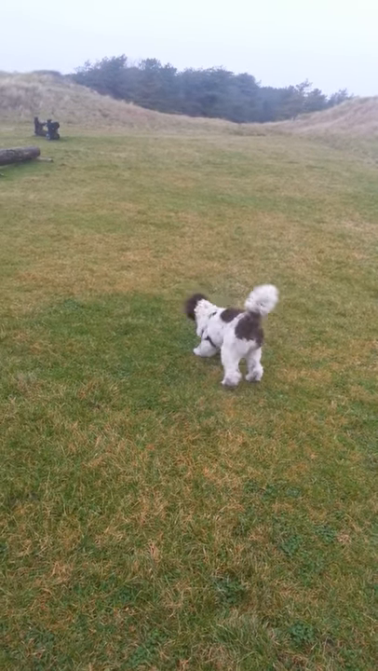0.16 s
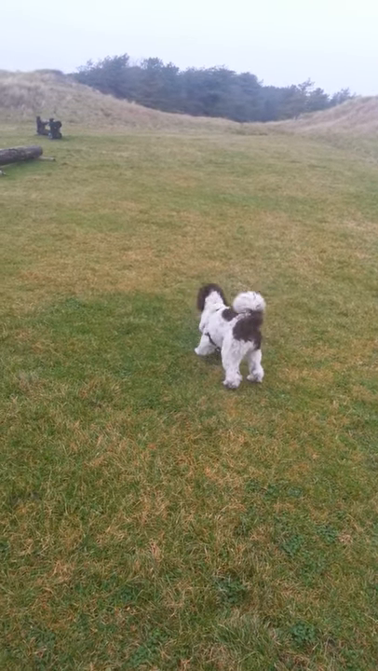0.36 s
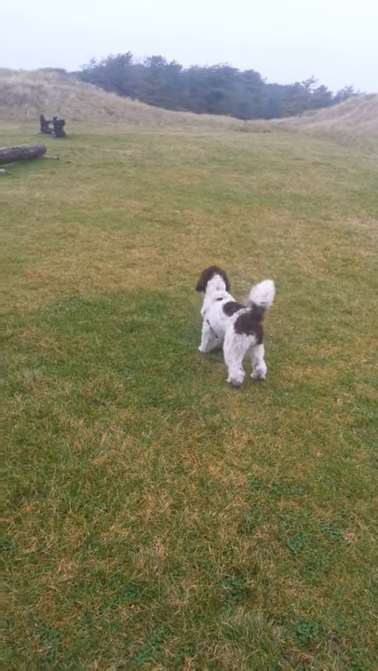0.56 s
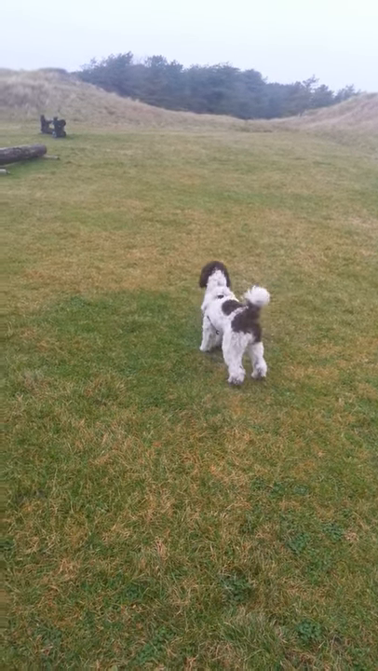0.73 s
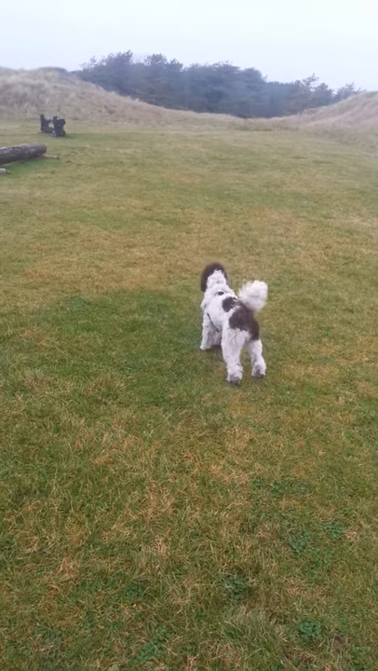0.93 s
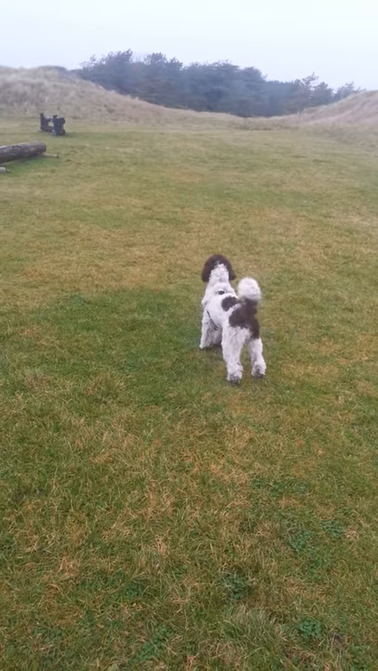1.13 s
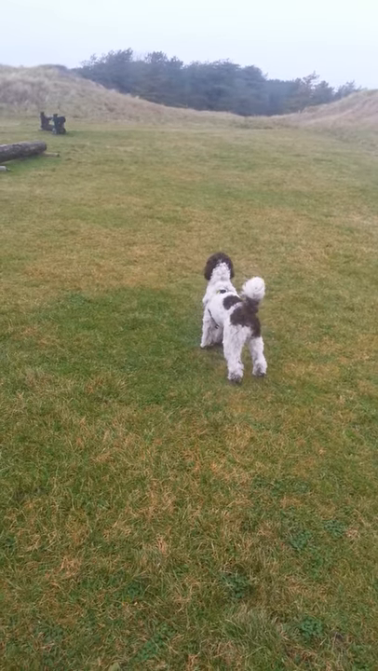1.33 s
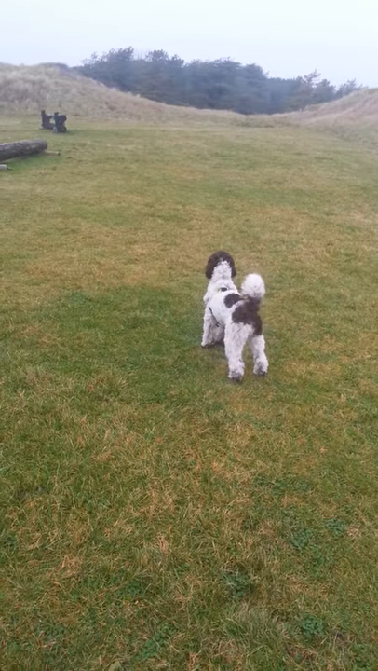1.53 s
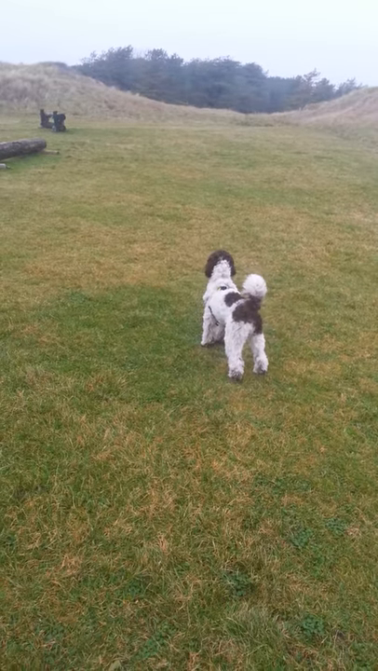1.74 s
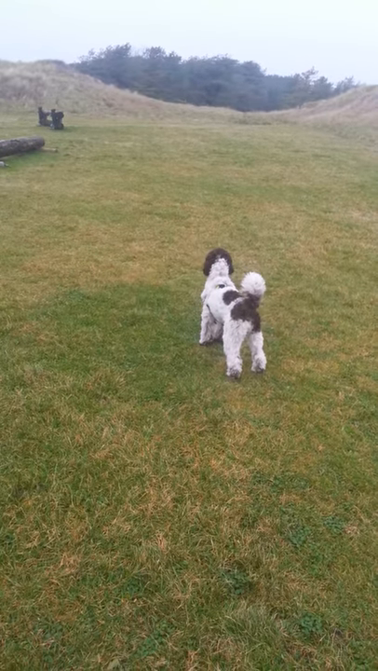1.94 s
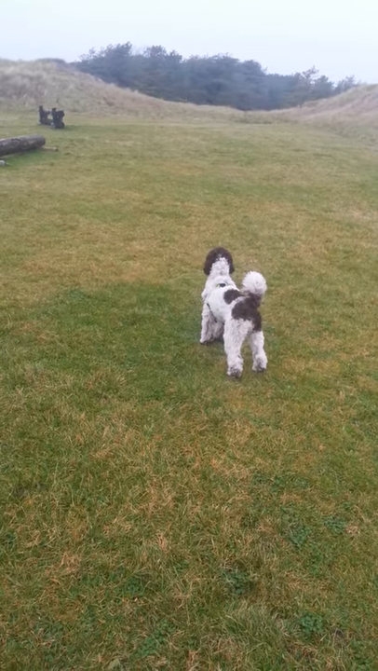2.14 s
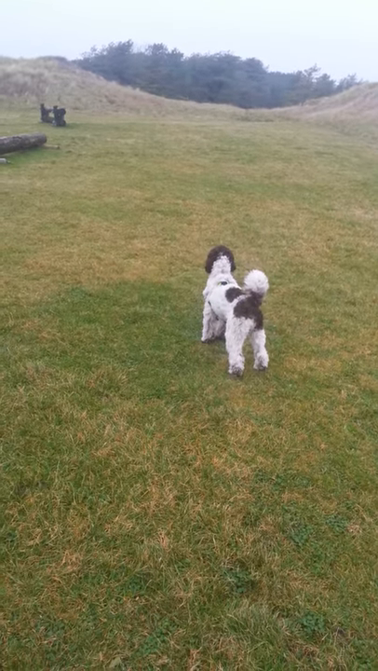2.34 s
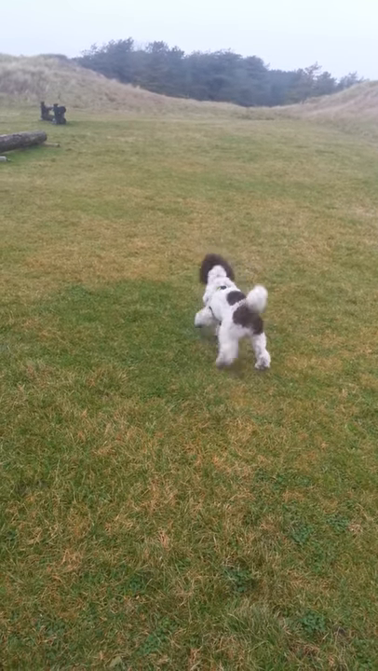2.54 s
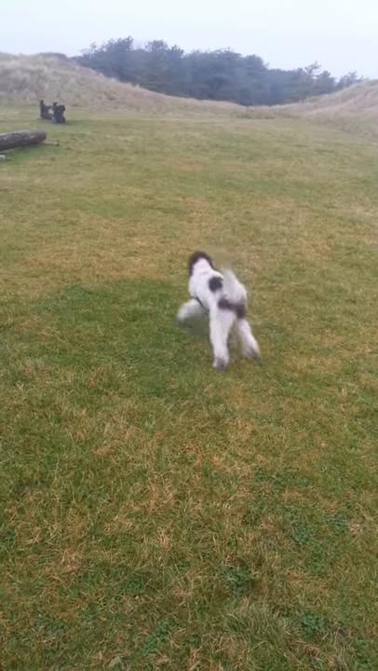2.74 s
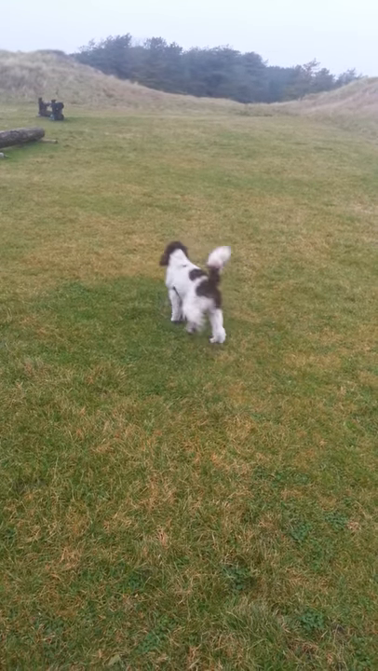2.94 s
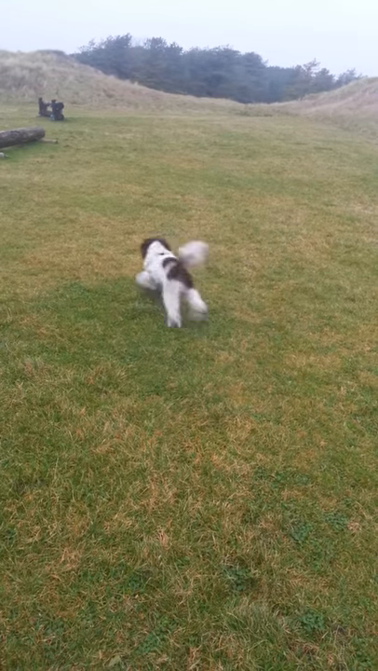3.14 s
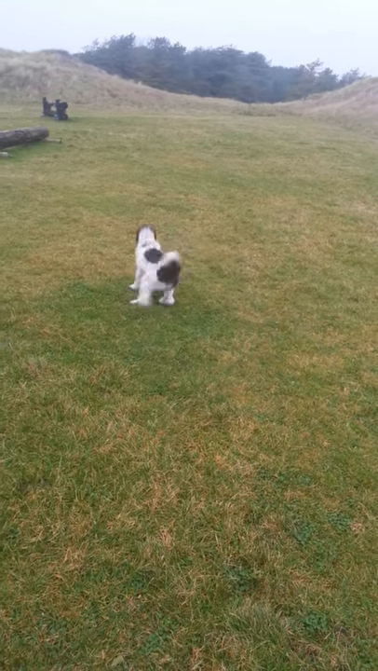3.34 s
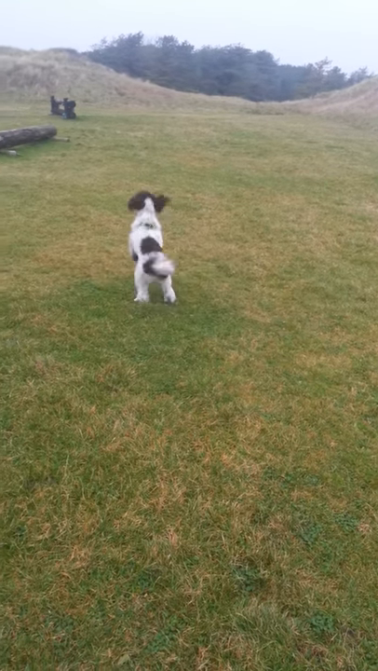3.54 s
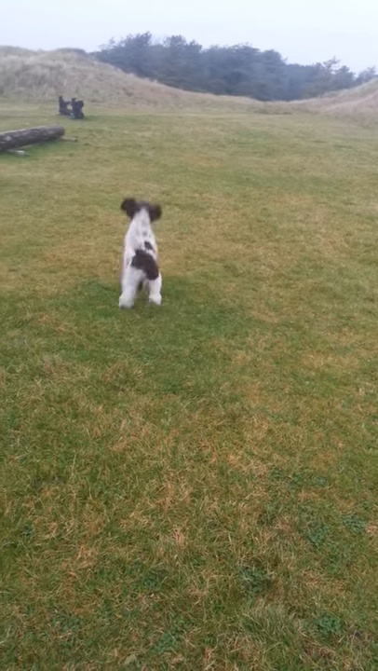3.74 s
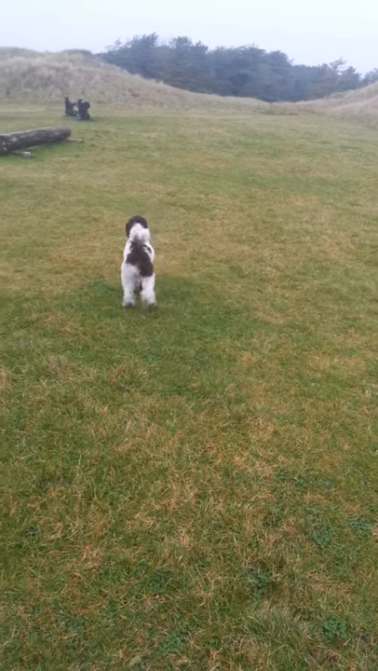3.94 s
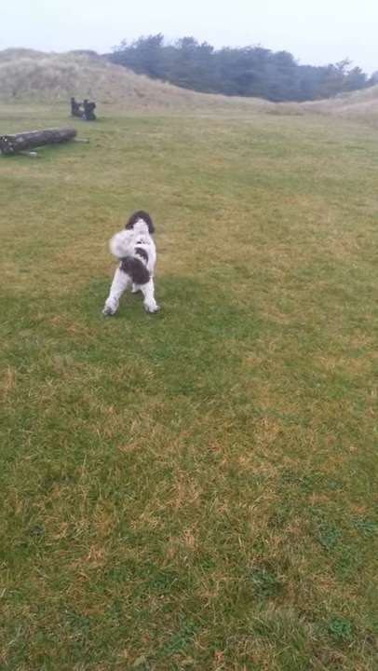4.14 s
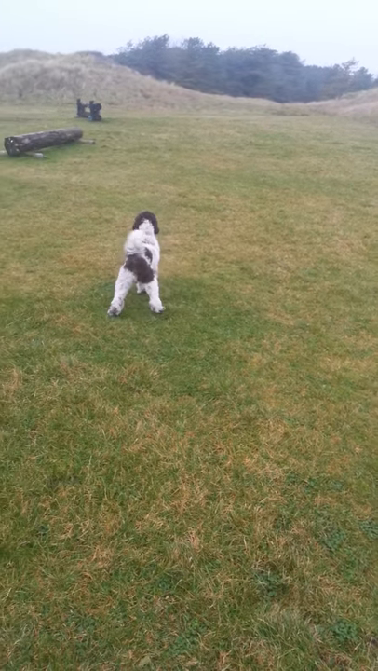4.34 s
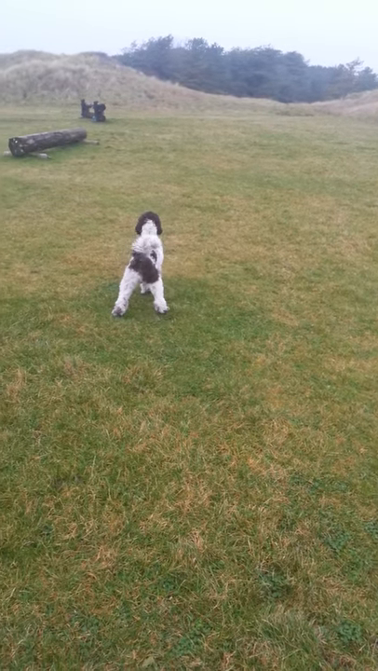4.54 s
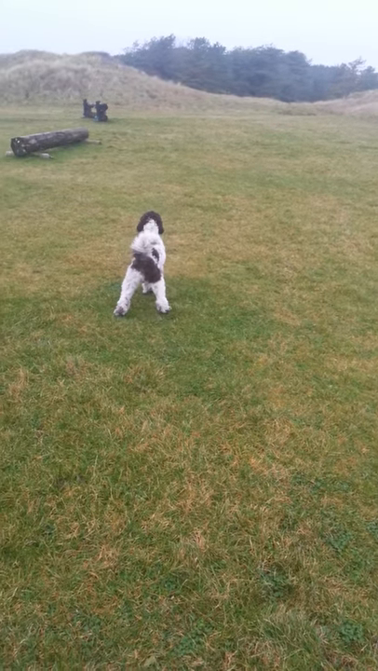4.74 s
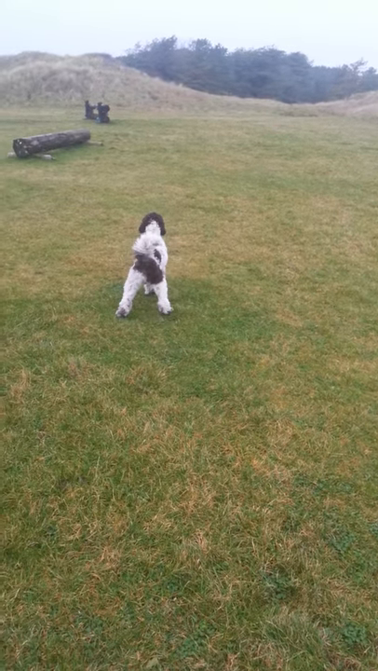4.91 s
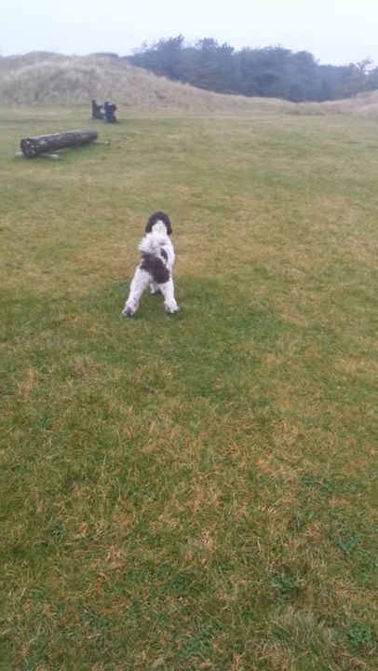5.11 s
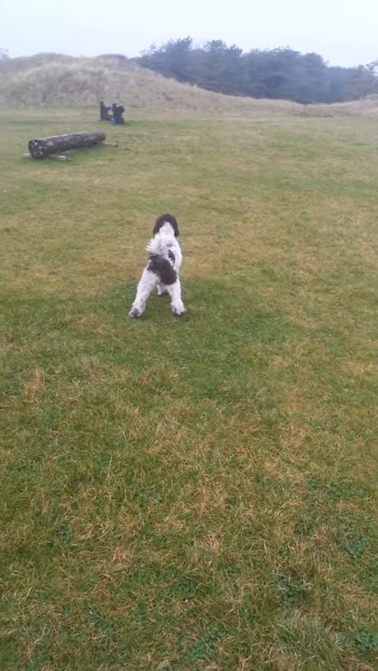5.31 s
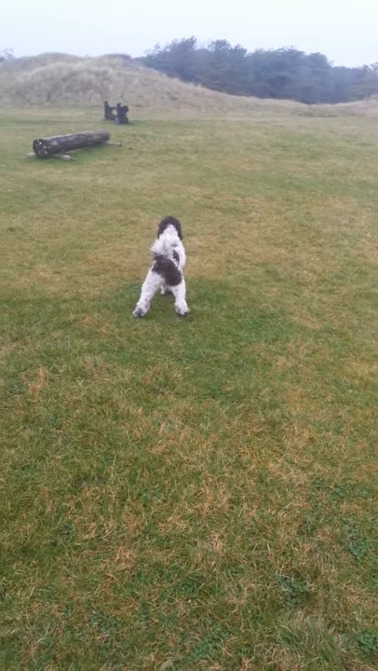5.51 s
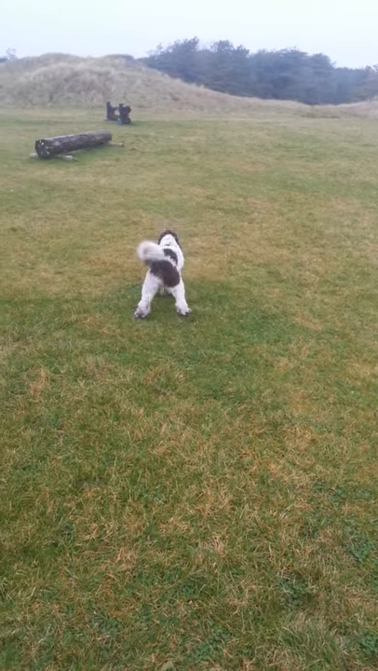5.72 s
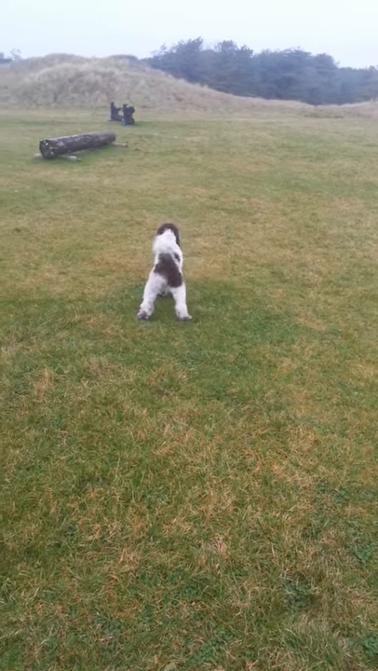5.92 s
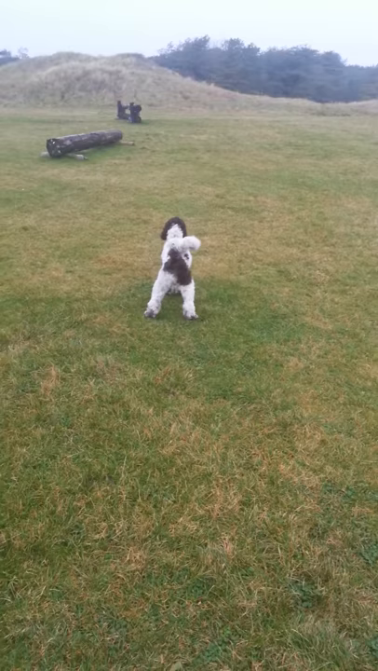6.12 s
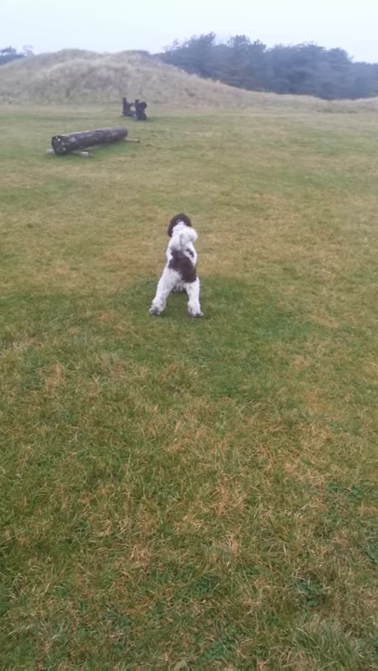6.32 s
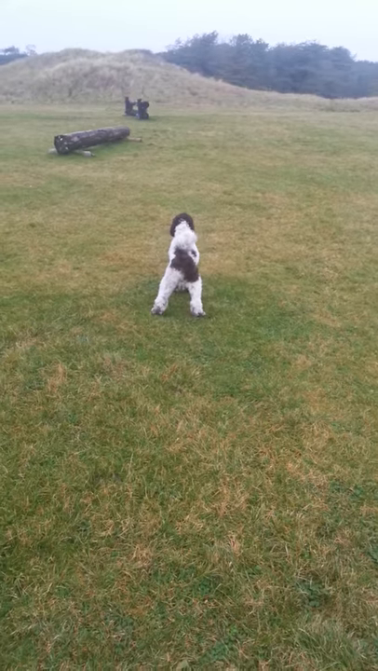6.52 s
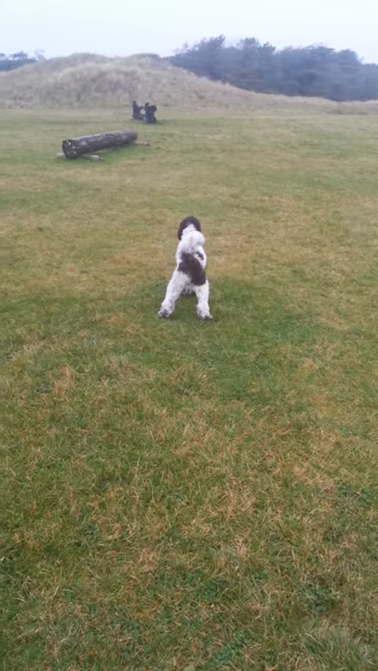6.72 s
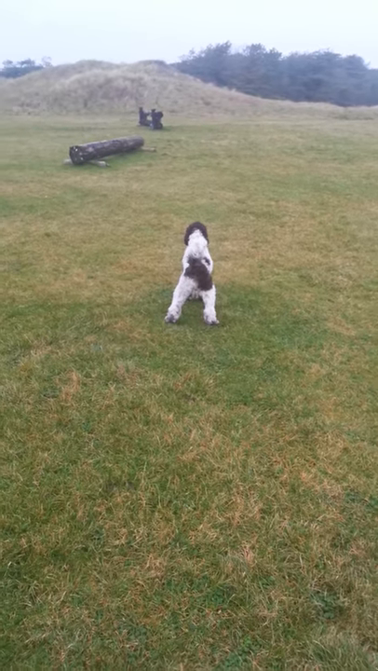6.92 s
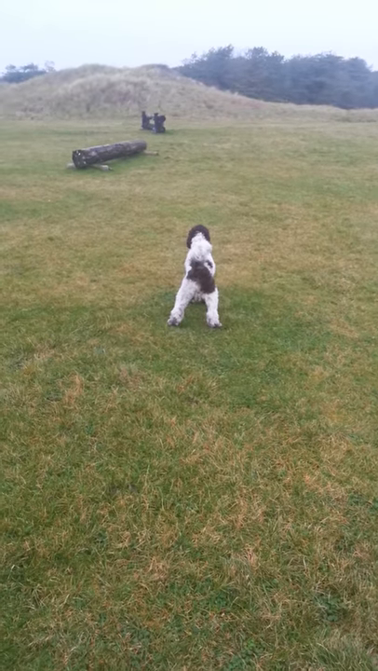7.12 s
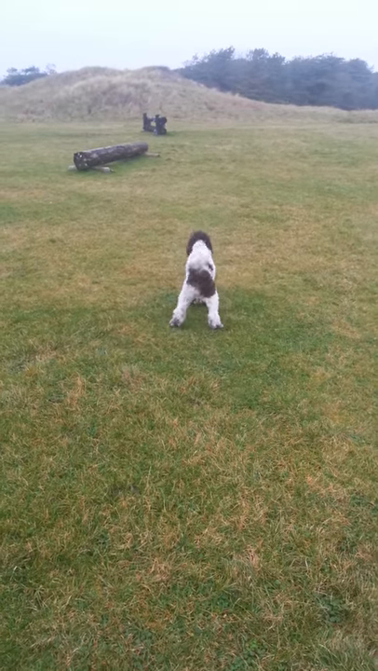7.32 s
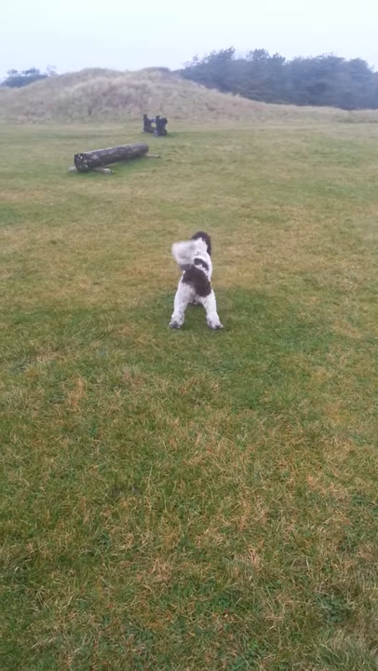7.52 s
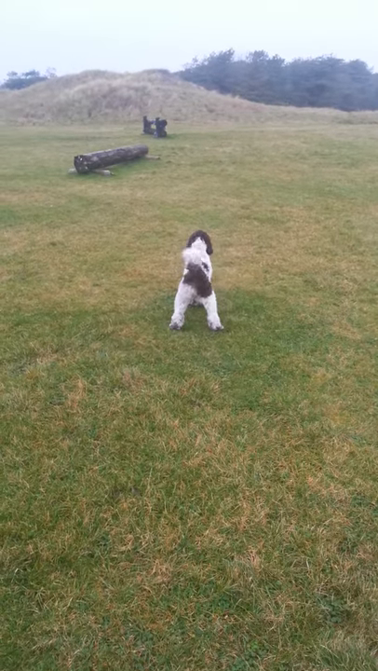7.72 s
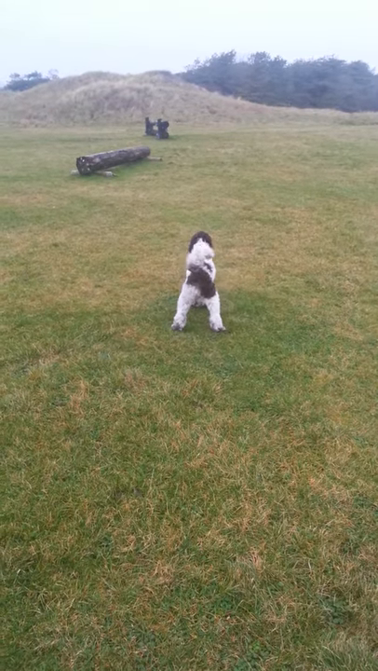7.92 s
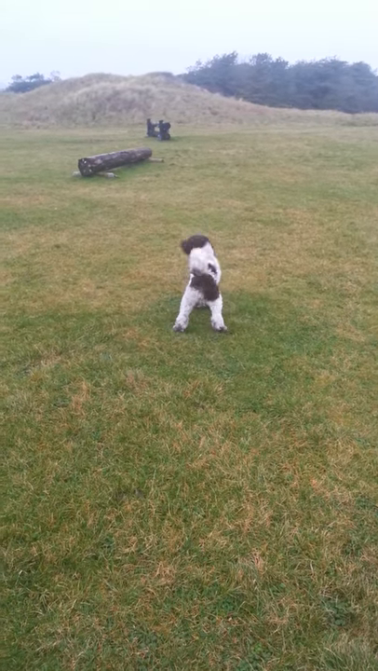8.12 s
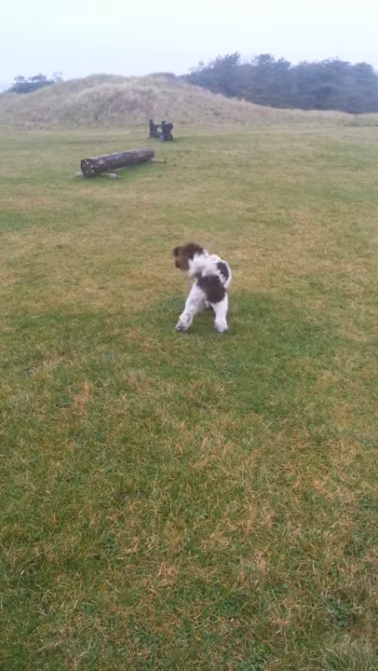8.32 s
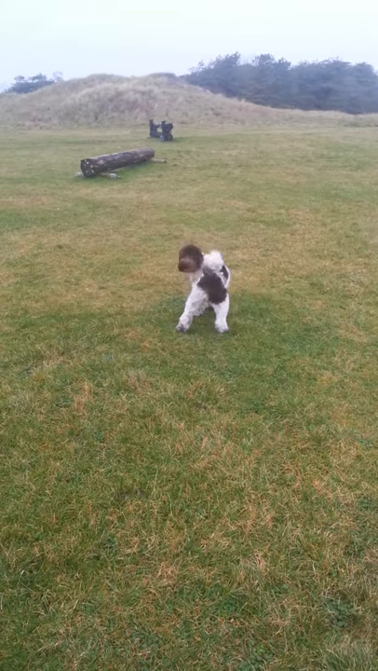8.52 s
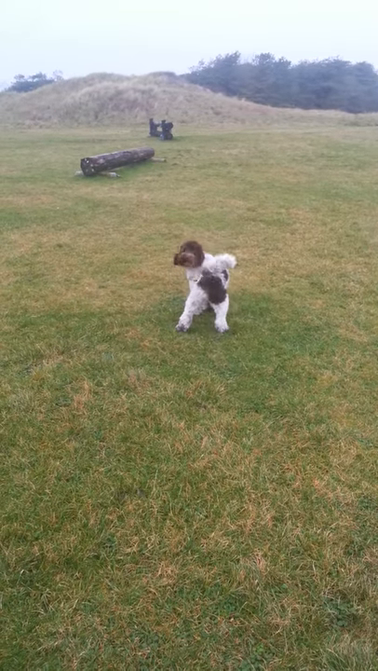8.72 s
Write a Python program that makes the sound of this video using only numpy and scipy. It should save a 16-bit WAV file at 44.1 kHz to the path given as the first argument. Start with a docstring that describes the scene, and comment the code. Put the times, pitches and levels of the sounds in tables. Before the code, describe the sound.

A young dog barks outdoors a few metres from a handheld camera: a bark already under way at the start, then short, hoarse yaps with long gaps, two coming close together. Soft growls and breaths surround some. A faint scattered echo follows. Wind thumps the microphone increasingly, over a far dull roar, light hiss, a thin whine and small focus clicks.

```python
"""A young dog barks on a grassy field between dunes, a few metres from a hand-held camera, with low growls
around some barks: vocal-fold harmonics and air noise through a tract, a faint echo from the dunes after them.
Gusts buffet the two microphone ports as lumpy low noise; under all lies a far roar (surf or traffic).
Gliding tones chirp far off. Inside the camera the focus drive ticks as ringing clicks with a short whirr,
noise hisses, and a thin sine whines near the left port."""
import sys
import numpy as np
from scipy import signal
from scipy.fft import rfft, irfft, next_fast_len
from scipy.io import wavfile
from scipy.ndimage import uniform_filter1d, minimum_filter1d, map_coordinates

SR = 44100
rng = np.random.default_rng(int(sys.argv[2]) if len(sys.argv) > 2 else 0)


def output_pcm(signal):
    """Save a mono or channel-first signal as 16-bit PCM at the path in sys.argv[1].

    Samples are clipped to [-1, 1] before scaling.
    """
    pcm = np.clip(np.atleast_2d(signal).T, -1, 1) * 32767
    wavfile.write(sys.argv[1], SR, np.round(pcm).astype(np.int16))


N = 390726
PADDED = next_fast_len(N + SR // 10)   # room for filter tails
BINS_HZ = np.fft.rfftfreq(PADDED, 1 / SR)

# where turbulent air rings in throat and mouth: centre_hz, width_hz, level_db
THROAT = [(599, 180, -0.5), (926, 150, 1), (1574, 140, -5.5), (2146, 250.7, -26)]
# moments when the folds skip a beat and the throat rings freely: time_s, peak_db (before the ports colour it)
BREAKS = [(0.832, -6), (0.899, -25), (0.939, -29.5), (2.544, 6), (2.578, 2.5), (3.224, -26), (3.515, -9),
          (3.544, 3.5), (3.623, -20), (5.635, -12.5), (5.68, -15), (7.364, -14), (7.394, -14.5),
          (8.212, -7.5)]


def amp(db):
    """Decibels to gain."""
    return 10 ** (np.asarray(db) / 20)


def rms_one(x):
    """Scales to unit power."""
    return x / np.sqrt(np.mean(np.abs(x) ** 2, axis=-1, keepdims=True) + 1e-20)


def in_time(rows, t):
    """Table columns read at times t."""
    s, *columns = np.transpose(rows)
    return [np.interp(t, s, c) for c in columns]


def at_hz(points, hz):
    """Straight lines between table points on a log-frequency axis."""
    points_hz, values = np.transpose(points)
    return np.interp(np.log(hz + 1), np.log(points_hz + 1), values)


def drift(rate_hz, size=N):
    """Slow chance with spread 1: white noise through two equal poles."""
    r = np.exp(-2 * np.pi * rate_hz / SR)
    slow = signal.lfilter([1], [1, -2 * r, r * r], rng.standard_normal(size + 8000))
    return rms_one(slow[-size:])   # the settling start is dropped


def coloured(x, spectrum):
    """Shapes a sound by a table of frequency and dB."""
    return irfft(rfft(x, PADDED) * amp(at_hz(spectrum, BINS_HZ)), PADDED)[..., :N]


def resonance(x, hz, width_hz):
    """Two-pole resonance, gain 1 on top."""
    r = np.exp(-np.pi * width_hz / SR)
    zeros = np.array([1, 0, -1]) * (1 - r * r) / 2
    poles = [1, -2 * r * np.cos(2 * np.pi * hz / SR), r * r]
    return signal.lfilter(zeros, poles, x)


def cavities(x, table):
    """Parallel resonances, each applied twice for dark valleys."""
    out = 0
    for hz, width_hz, db in table:
        once = resonance(x, hz, width_hz)
        out = out + amp(db) * resonance(once, hz, width_hz)
    return out


def pan(left_minus_right_db):
    """Left and right gain for a level difference, total power kept."""
    left = amp(left_minus_right_db)
    return np.array([left, 1 + 0 * left]) * np.sqrt(2 / (1 + left ** 2))


def dog():
    """Barks and growls: calls that follow without a pause form one phrase, faded in and out."""
    # calls: colour at full effort (chest_db, palate_db, rasp_db, air_db, all re throat),
    # then the gesture rows (start_s, pitch_hz, throat_db, mouth_db re throat)
    voice = [ ((-6.5, -14, -21.5, -11), [(0.0, 412, -12, 6.5), (0.052, 466.6, -12, -6.5),
             (0.086, 432, -18.5, -8), (0.102, 375.3, -27, -16.5), (0.135, 269, -37, -18)]),
             ((-4.5, -33.5, -34, -19), [(0.61, 126.9, -56.5, -3.5), (0.64, 123.6, -42.5, -30),
             (0.696, 124.4, -48, -16), (0.758, 170.5, -44, -24.5), (0.775, 234.7, -39.5, -29)]),
             ((-7.5, -38.5, -33.5, -12), [(0.78, 283.4, -37.5, -28.5), (0.794, 337.9, -20, -20),
             (0.81, 409.6, -14, -0.5), (0.846, 467.1, -9, -14.5), (0.862, 492, -12.5, 1.5),
             (0.901, 442.8, -15.5, -11), (0.913, 396.3, -24, -9.5), (0.941, 292.6, -26, -25),
             (0.97, 214.7, -39, -7)]), ((-5.5, -27, -24, -15), [(0.975, 198.4, -48, -15.5),
             (0.991, 154, -43, -15), (1.029, 132.8, -44, -22), (1.209, 110, -62, -22),
             (1.26, 102, -52, -17)]), ((-6, -35.5, -34.5, -8.5), [(2.44, 153.4, -54.5, -23.5),
             (2.478, 252.3, -35, -39), (2.496, 382.8, -18, -3.5), (2.51, 437.2, -14, 1),
             (2.533, 458.6, -9, -3.5), (2.561, 529.8, -13, -7.5), (2.587, 506, -16, -9.5),
             (2.6, 446, -19.5, -10.5), (2.66, 196, -39.5, -24)]), ((0, -30, -36, -10.5),
             [(3.105, 186.5, -53, -12), (3.121, 281.3, -44.5, -19.5), (3.135, 361.8, -25, -1.5),
             (3.151, 456, -22, 0), (3.19, 496.5, -17, -1.5), (3.211, 514, -18, 2.5),
             (3.229, 494.4, -16.5, -10), (3.251, 477, -26.5, -4.5), (3.3, 320.9, -49, -30)]),
             ((-3.5, -31, -26, -18.5), [(3.305, 291.5, -66, -14), (3.329, 233.2, -49.5, -10),
             (3.361, 198, -47.5, 1), (3.419, 147.8, -44, -24), (3.437, 172.8, -45, -22),
             (3.455, 199, -44, -39)]), ((-8.5, -40, -35.5, -9.5), [(3.46, 230.4, -29.5, -34),
             (3.474, 326, -28, -27), (3.482, 360.6, -17.5, -13), (3.51, 421, -15, -14),
             (3.543, 450, -20.5, 4), (3.573, 416.4, -14, -7), (3.603, 378, -35, -24),
             (3.627, 298.5, -35.5, -33), (3.66, 224, -22.5, -2)]), ((-11.5, -27.5, -36, -12),
             [(5.555, 156.2, -54, -24), (5.589, 319, -20.5, -35), (5.601, 393.2, -21, -13),
             (5.627, 455, -11.5, -7), (5.652, 486.7, -9.5, -16.5), (5.667, 519, -14.5, -13),
             (5.683, 535, -6, -21.5), (5.712, 475, -20, -24), (5.733, 330, -19.5, -21),
             (5.755, 280, -48, -5)]), ((-10.5, -27, -35, -12.5), [(7.275, 152.2, -33, -20.5),
             (7.295, 263.4, -27.5, -26), (7.321, 431, -16.5, 0.5), (7.359, 461.9, -9.5, -3.5),
             (7.385, 449.7, -17, 1.5), (7.411, 424.4, -16.5, -12), (7.448, 332, -31, -20),
             (7.489, 240, -59, 1), (7.53, 173, -49, -10)]), ((-14, -20, -23, -14),
             [(8.14, 213.8, -40.5, -19), (8.156, 287.5, -30, -33.5), (8.172, 381.4, -21.5, -12),
             (8.2, 469.1, -14.5, -2.5), (8.237, 498.4, -5.5, -9.5), (8.263, 490, -15, 0),
             (8.286, 425, -12.5, -12.5), (8.307, 305, -17, -32), (8.335, 250, -50, -15)]), ]
    phrases = []
    for colour_db, rows in voice:
        if not phrases or rows[0][0] - phrases[-1][-1][0] > .05:
            phrases.append([])
        phrases[-1] += gesture(colour_db, rows)
    out = np.zeros(N)
    for rows in phrases:
        sound, start = utterance(rows), round(rows[0][0] * SR)
        ramp = np.arange(len(sound)) / (0.024 * SR)
        fade_in = np.minimum(ramp, 1) if start else 1   # a call under way at 0 s starts at full level
        fade_out = np.minimum(ramp[::-1] / 2, 1)
        out[start:start + len(sound)] = sound * fade_out * fade_in
    # the voice keeps nothing below about 80 Hz
    return signal.sosfilt(signal.butter(4, 80, "high", fs=SR, output="sos"), out)


def gesture(colour_db, rows):
    """Adds the colour that effort gives; throat and mouth swing fully, the other parts follow in part."""
    # throat level that a pitch usually brings: pitch_hz, level_db
    usual_throat = [(120, -49.5), (250, -35.5), (400, -16.5), (520, -13)]
    # what slack folds add: chest_db, palate_db, rasp_db, air_db
    slack_colour_db = np.array((11.5, 5.5, 7.5, -8.5))
    # share of the throat's own swings not followed (0-1): chest, palate, rasp, air
    steadiness = np.array((0.8, 0.49, 0.584, .4))
    open_share, usual_mouth_db = 0.31, -8   # palate and rasp follow this share of a wider or narrower mouth
    out = []
    for s, pitch, throat, mouth in rows:
        swing_db = throat - at_hz(usual_throat, pitch)
        slack = 1 - effort(pitch)
        chest, palate, rasp, air = colour_db + slack * slack_colour_db - swing_db * steadiness
        open_db = open_share * effort(pitch) * (mouth - usual_mouth_db)
        out.append((s, pitch, throat, chest, mouth, palate + open_db, rasp + open_db, air))
    return out


def utterance(rows):
    """Harmonics of the vocal folds through the tract; rough folds trade the clean line for sidebands."""
    # where chest, throat, mouth, palate and rasp act: centre_hz
    regions_hz = [400, 900, 1600, 2500, 6500]
    # fine colour of the voice as heard, with a gap near 4.5 kHz: frequency_hz, gain_db
    fine_colour = [(115, 5.5), (240, 10), (300, 5.5), (355, -9.5), (430, 0), (600, 2), (950, 4), (1250, -9),
                   (1600, 1), (2000, -2.5), (2300, -3.5), (2800, -9.5), (3300, -16), (3900, -4.5),
                   (4350, -20), (4800, -21.5), (5400, -2), (6400, -5), (7400, -2), (8400, -10), (9300, -48)]
    flutter_hz, wobble, shared = 150, 0.014, 0.44   # shared: part of the flutter common to all harmonics
    break_air_db, break_air_s, fall_air_db = 7, 0.0083, 4.5   # more air leaks at breaks and in collapse
    patchy_db = 4.5   # upper harmonics swell and fade each on its own
    t = np.arange(round(rows[0][0] * SR), round(rows[-1][0] * SR)) / SR
    size = len(t)
    pitch, throat, chest, mouth, palate, rasp, air = in_time(rows, t)
    pitch = uniform_filter1d(pitch, size=700, mode="nearest")   # muscles round the glide off
    rough = roughness(t, pitch)
    air = air + break_air_db * near_break(t, break_air_s) + fall_air_db * collapse(pitch)
    phase = 2 * np.pi * np.cumsum(pitch * (1 + wobble * rough * drift(60, size))) / SR
    regions = np.array([chest, 0 * t, mouth, palate, rasp])

    def flutter():
        return (drift(flutter_hz, size) + 1j * drift(flutter_hz, size)) / np.sqrt(2)

    together, out = flutter(), np.zeros(size)
    for k in range(1, 33):
        hz = k * pitch
        place = np.interp(np.log(hz), np.log(regions_hz), np.arange(len(regions)))
        region_db = map_coordinates(regions, [place, np.arange(size)], order=1)
        noisy = 1 - (1 - rough) ** (.42 * (k - .85))   # high harmonics lose their order first
        sidebands = shared * together + np.sqrt(1 - shared ** 2) * flutter()
        fold = np.sqrt(1 - noisy) + np.sqrt(noisy) * sidebands
        region_db += patchy_db * np.clip(place - 2, 0, 1) * drift(14.0, size)
        lag = k * k   # the tract spreads the harmonics in phase
        level = amp(throat + region_db + at_hz(fine_colour, hz)) * np.sqrt(pitch / 400)
        out += level * np.real(fold * np.exp(1j * (k * phase + lag)))
    return out + amp(throat + air) * rms_one(cavities(rng.standard_normal(size), THROAT))


def effort(pitch):
    """Pitch tells how taut the folds are, 0-1."""
    slack_hz, taut_hz = 192.8, 425   # no effort and full effort
    return np.clip((pitch - slack_hz) / (taut_hz - slack_hz), 0, 1)


def roughness(t, pitch):
    """Slack folds are rough, taut ones as hoarse as the dog is, more so in collapse; breaks shake them."""
    # hoarseness of the taut folds along the bout: time_s, roughness (0-1)
    hoarse_points = [(0, .3), (.8, .12), (2.5, .33), (3.2, .45), (3.5, .32), (5.6, .2), (7.3, .15),
                     (7.42, .3), (8.2, .15), (8.23, .04)]
    slack_rough, break_rough, break_s, fall_rough = .45, .35, .012, .8   # fall_rough: share of hoarseness added
    taut = effort(pitch)
    hoarse = in_time(hoarse_points, t)[0] * (1 + fall_rough * collapse(pitch))
    shaken = break_rough * near_break(t, break_s)
    return np.minimum(taut * hoarse + (1 - taut) * slack_rough + shaken, .75)


def collapse(pitch):
    """How fast the folds let go, 0-1, from the relative fall of the pitch."""
    fast_fall_per_s = 8   # counts as full collapse
    return np.clip(-np.gradient(np.log(pitch)) * SR / fast_fall_per_s, 0, 1)


def near_break(t, span_s):
    """1 at a break, 0 far from any."""
    return np.minimum(sum(np.exp(-((t - s) / span_s) ** 2) for s, db in BREAKS), 1)


def breaks():
    """One soft jolt of the folds rings the throat."""
    jolts, jolt = np.zeros(N), np.hanning(round(0.00098 * SR))
    for s, db in BREAKS:
        jolts[round(s * SR):][:len(jolt)] = amp(db) * jolt
    one_ring = cavities(np.r_[jolt, np.zeros(900)], THROAT)
    # the tiny offset keeps the filters off extremely small numbers
    return cavities(jolts + 1e-18, THROAT) / one_ring.max()


def breath():
    """Breathy puffs around the barks and one growl, perhaps the dog drawing air: noise rung through the nose."""
    # puffs: start_s, length_s, top_db (before the ports colour it)
    puffs = [(0.652, 0.052, -55), (2.598, 0.17, -53.5), (3.282, 0.19, -53), (5.645, 0.46, -50.5),
             (7.45, 0.13, -57), (8.3, 0.15, -44.5)]
    # nose resonances: centre_hz, width_hz, level_db
    nose = [(1636, 650, 6), (3240, 420, -2.5), (4800, 1200, -6.5), (7060, 3200, -11)]
    shape = np.zeros(N)
    for s, length, db in puffs:
        part = np.linspace(0, 1, round(length * SR))
        # swells fast and ebbs slowly
        shape[round(s * SR):][:len(part)] += amp(db) * np.sin(np.pi * np.sqrt(part)) ** 2
    return shape * rms_one(cavities(rng.standard_normal(N), nose))


def port_lead():
    """Phase turn of left and right against the middle."""
    # phase between the ports: frequency_hz, left_lead_rad
    port_phase = [(0, -1), (430, 1.0), (1550, 0.43), (2500, 2), (2840, 0.75), (3450, 3.5), (5250, 5),
                  (5860, 5), (6460, 4), (6720, 6.5), (7320, 8.5), (7840, 2.5), (8530, -7), (8790, -1.5)]
    lead = np.exp(.5j * np.interp(BINS_HZ, *np.transpose(port_phase)))
    return np.array([lead, lead.conj()])


def ports(x):
    """The two microphone ports hear the voice with their own colour and lag."""
    # level between the ports: frequency_hz, left_minus_right_db
    port_balance = [(100, 0.5), (370, -7), (570, 2.5), (900, 2.5), (1420, -1), (2230, -6.5), (3500, -6.5),
                    (4500, -2.5), (5400, -1), (6400, 13), (7500, 21), (8600, 13)]
    gains = pan(at_hz(port_balance, BINS_HZ)) * port_lead()
    return irfft(rfft(x, PADDED) * gains, PADDED)[:, :N]


def dunes(x):
    """Scattered return from the slopes: delayed, dying, own in each channel."""
    delay_s, t60_s, echo_db = 0.0072, 0.25, -21.5
    since = np.maximum(np.arange(SR) / SR - delay_s, 0)
    scatter = rng.standard_normal((2, SR)) * amp(-60 * since / t60_s) * np.minimum(since / 0.01, 1)
    scatter /= np.sqrt(np.sum(scatter ** 2, axis=1, keepdims=True))
    # grass swallows the lows
    thin = signal.sosfilt(signal.butter(2, 1300, "high", fs=SR, output="sos"), x)
    return amp(echo_db) * signal.fftconvolve(thin[None], scatter)[:, :N]


def gusts(t):
    """Wind strength at each port: a wavering breeze with the buffets on top."""
    # breeze between buffets: time_s, level_db (3 dB is added at the end), left_minus_right_db
    breeze = [(0, -53.5, -3), (.3, -70.5, -2.5), (1.1, -53.5, -1.5), (1.4, -59.5, -0.5), (2.0, -67, -2.5),
              (2.4, -53, 8.5), (2.65, -41.5, 3), (2.95, -53.5, -4), (3.5, -57.5, -1.5), (3.85, -68, 4),
              (4.3, -50, -8), (4.85, -48, 8.5), (5.45, -49.5, -0.5), (5.7, -49.5, 8.5), (6.35, -52, 4),
              (7.2, -50.5, -12.5), (7.7, -50, 1), (8.3, -41, 2), (8.86, -55, -5)]
    # strong buffets: top_s, level_db (3 dB is added at the end), length_s, left_minus_right_db
    buffets = [(1.454, -62, 0.045, 7), (1.584, -56.5, 0.048, 5), (2.028, -56, 0.077, -23.5),
               (2.466, -34, 0.035, 15), (2.622, -40, 0.11, 12), (2.741, -38, 0.044, 23),
               (3.04, -48.5, .05, -17.5), (3.682, -41, 0.093, 12), (4.201, -49.5, .06, -16),
               (4.559, -35.5, 0.12, 13.5), (4.694, -51, 0.022, 13), (4.785, -31, 0.016, 25),
               (4.886, -31, 0.11, 8), (5.051, -40.5, 0.083, 14), (5.226, -43, 0.073, -1.5),
               (5.606, -34.5, 0.029, -5), (5.869, -39, 0.042, 9), (5.935, -40.5, 0.056, 23),
               (6.225, -43, 0.078, -10), (6.559, -31.5, 0.13, 30), (6.8, -43.5, .06, 21.5),
               (7.028, -33.5, 0.029, -20), (7.138, -38, .04, -22), (7.282, -39.5, 0.064, -2),
               (7.613, -40.5, 0.03, -24.5), (7.833, -22.5, 0.041, 26), (7.887, -26.5, 0.028, 10),
               (8.096, -33, 0.12, 33), (8.307, -39, 0.044, -6), (8.364, -38.5, .06, 10),
               (8.45, -36.5, 0.067, 1), (8.602, -36.5, 0.043, 14)]
    level_db, side_db = in_time(breeze, t)
    level = amp(level_db + 6 * drift(9.9))
    power = (level * pan(side_db + 9.5 * drift(6.0))) ** 2
    for s, db, length, left_db in buffets:
        swell = np.exp(-(2 * (t - s) / length) ** 2)
        power = power + (amp(db) * pan(left_db)[:, None] * swell) ** 2
    return np.sqrt(2 * power)   # unrelated ports add by power


def wind(gust):
    """Lumpy low noise, unrelated in the two ports, and single slaps on the membrane."""
    # colour of the eddies: frequency_hz, relative density_db
    buffet = [(15, -51.5), (30, -25.5), (50, -7), (90, -1), (150, -3.5), (250, -13.5), (400, -23),
              (800, -62.5)]
    # wind slaps on a port: time_s, level_db (before panning), left_minus_right_db
    pops = [(7.838, -4, 20)]
    lumps = amp(3.2 * np.array([drift(40), drift(14)]))
    eddies = lumps * coloured(rng.standard_normal((2, N)), buffet)
    slow_level = np.sqrt(uniform_filter1d(eddies ** 2, size=1800) + 1e-12)
    out = gust * eddies / slow_level   # the gust alone sets the slow level
    for s, db, side_db in pops:
        t = np.arange(-300, 900) / SR
        swing = 1 / (1 + np.exp(-t / .0003)) * np.exp(-t / .005)   # sudden push, damped swing
        slap = swing * np.cos(2 * np.pi * (140 * t + .35 * (1 - np.exp(-t / .002))))
        out[:, round((s + t[0]) * SR):][:, :len(t)] += amp(db) * pan(side_db)[:, None] * slap
    return out


def focus_drive():
    """Ticks that ring the lens carriage briefly, and the level of the whirr that fades after each."""
    # ticks: time_s, impulse_db (before ringing), small tick just ahead_db re tick
    tick_rows = [(0.762, -30, -12), (2.0418, -29.5, -13), (2.124, -30.5, -37), (3.322, -29.5, -6),
                 (3.3628, -38, -40), (3.4062, -29, -40), (3.4304, -31, -40), (4.6022, -30.5, -7),
                 (4.685, -30, -40), (5.8721, -31.5, -7), (7.1619, -30, -12), (8.4417, -29.5, -16),
                 (8.526, -30.5, -46)]
    clicks, whirr = np.zeros(N), np.zeros(N)
    fade = np.linspace(1, 0, round(.04 * SR))
    for s, db, ahead_db in tick_rows:
        at = round((s + .0009) * SR)
        clicks[at] += amp(db)
        clicks[at - round(.0021 * SR)] += amp(db + ahead_db)
        whirr[at:at + len(fade)] += amp(-58.5) * fade
    near_left = amp([[18], [6]]) * cavities(clicks, [(7650, 2160, 0)])
    return near_left + cavities(clicks, [(11600, 2400, 2.7), (5300, 1500, 1.9)]), whirr


def whine(t):
    """A thin sine that wanders a little in pitch and level."""
    # whine: time_s, pitch_hz, middle of the wavering left level_db
    whine_rows = [(0, 7680, -67.5), (3, 7745, -67.5), (6, 7790, -69), (8.86, 7710, -66)]
    hz, db = in_time(whine_rows, t)
    phase = 2 * np.pi * np.cumsum(hz + 12.5 * drift(15)) / SR
    return amp(db + 2.5 * drift(23)) * np.sqrt(2) * np.sin(phase)


def camera(t, gust):
    """Hiss that swells with gusts, focus ticks and whirr, the left port's cavity ringing to them; the whine."""
    # colour of the hiss: frequency_hz, relative density_db
    hiss = [(1500, -1), (3000, -5.5), (5000, -5), (6500, -4), (9000, -4), (12000, -6.5), (14500, -8)]
    # cavity resonance of the left port: centre_hz, width_hz, level_db re direct sound
    left_port = (7760, 690, 3)
    hiss_db, rustle_db = -67.5, -43.5   # steady level; gain from wind strength to hiss
    ticks, whirr = focus_drive()
    level = amp(hiss_db) + amp(rustle_db) * uniform_filter1d(gust, size=2000) + whirr
    noise = rms_one(coloured(rng.standard_normal((2, N)), [(500, -33.5)] + hiss))
    out = level * noise + ticks
    hz, width_hz, db = left_port
    out[0] += amp(db) * resonance(out[0], hz, width_hz)
    out[0] += whine(t)
    return out


def chirps():
    """Faint short gliding whistles with soft ends, perhaps a bird."""
    # chirps: start_s, length_s, start_hz, end_hz, peak_db
    chirp_rows = [(3.851, .05, 1800, 2250, -67.5), (4.69, .025, 2260, 2050, -59),
                  (5.3, 0.032, 2550, 2100, -71), (5.44, 0.039, 2440, 1700, -63.5),
                  (6.95, 0.044, 1950, 2200, -68)]
    out = np.zeros(N)
    for s, length, start_hz, end_hz, db in chirp_rows:
        size = round(length * SR)
        phase = 2 * np.pi * np.cumsum(np.linspace(start_hz, end_hz, size)) / SR
        out[round(s * SR):][:size] = amp(db) * np.hanning(size) * np.sin(phase)
    return out


def roar(t):
    """Far noise whose likeness between the ports depends on frequency, closest from about 160 to 440 Hz."""
    # level along the scene: time_s, level_db (before waver and panning)
    roar_level = [(0, -57.5), (.4, -53), (1.4, -50), (2.3, -51), (3, -48.5), (3.9, -51.5), (4.3, -48.5),
                  (4.9, -47.5), (5.4, -48), (6.3, -47.5), (7, -47), (8, -46.5), (8.86, -48.5)]
    # colour: frequency_hz, relative density_db
    roar_colour = [(88, -34), (150, -1.5), (318, -1.5), (512, 3), (692, -1), (775, -4.5), (1220, -14),
                   (1600, -20), (3000, -34), (3900, -63), (6600, -120)]
    # likeness of the ports: frequency_hz, correlation (-1 to 1)
    roar_likeness = [(60, 0.19), (160, 0.97), (440, 1), (1180, 0.54), (3200, -0.71), (8640, -0.05)]
    alike = np.clip(at_hz(roar_likeness, BINS_HZ), -1, 1)
    mid, side = rfft(coloured(rng.standard_normal((2, N)), roar_colour), PADDED)
    spectra = np.sqrt(1 + alike) * mid + np.sqrt(1 - alike) * side * [[1], [-1]]
    both = irfft(spectra * port_lead(), PADDED)[:, :N]
    level = amp(in_time(roar_level, t)[0] + 0.33 * drift(4.13))
    return level * pan(-3.0)[:, None] * rms_one(both)


def scene():
    """Dog and echo over wind, roar, far chirps and camera noise."""
    t = np.arange(N) / SR
    gust = gusts(t)
    voice = ports(dog() + breaks() + breath())
    return voice + dunes(voice[0]) + wind(gust) + roar(t) + chirps() + camera(t, gust)


def record(dry):
    """A look-ahead limiter, linked across both channels, holds the peaks; then the top is cut."""
    limit, cutoff_hz = .97, 15300
    room = np.minimum(limit / (np.abs(dry).max(axis=0) + 1e-9), 1)
    gain = uniform_filter1d(minimum_filter1d(room, size=301), size=301)
    return signal.sosfilt(signal.cheby2(16, 70, cutoff_hz, fs=SR, output="sos"), gain * dry)


dry = scene()
out = record(dry)
output_pcm(out)
```